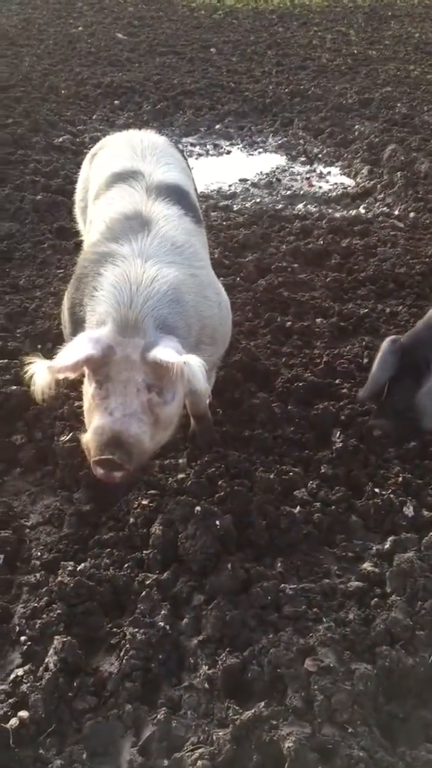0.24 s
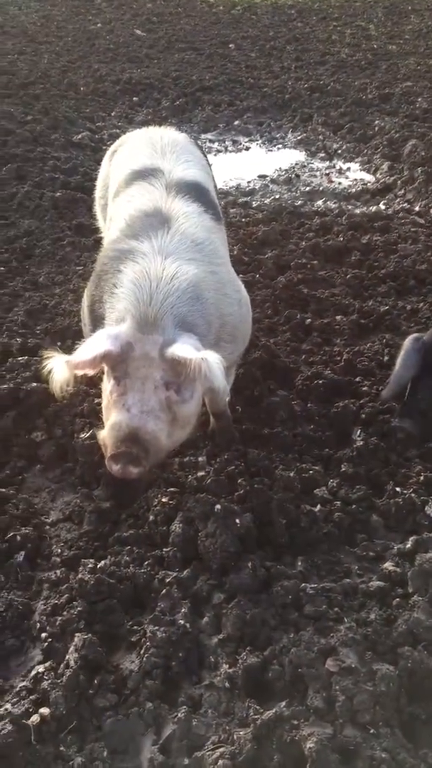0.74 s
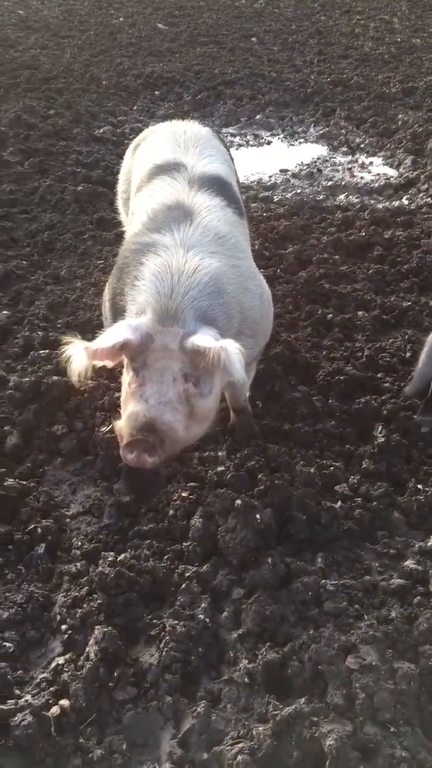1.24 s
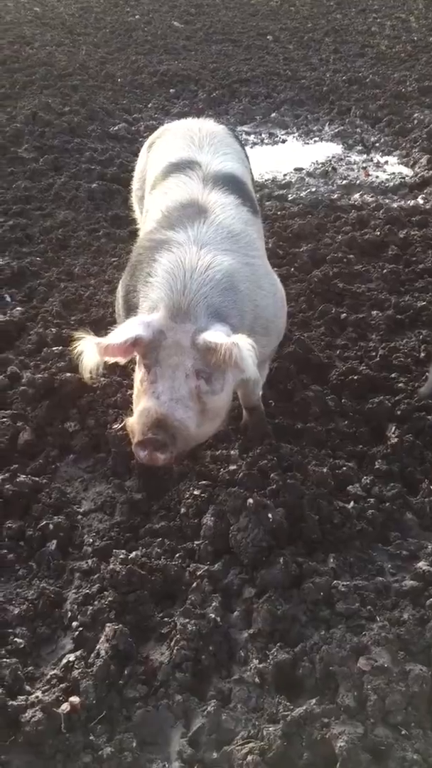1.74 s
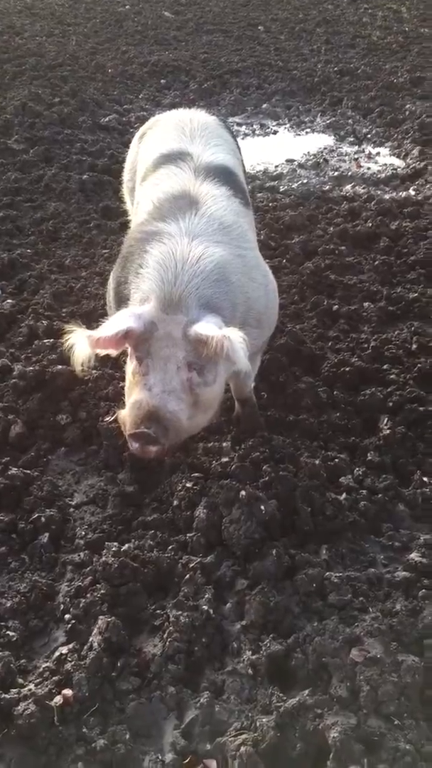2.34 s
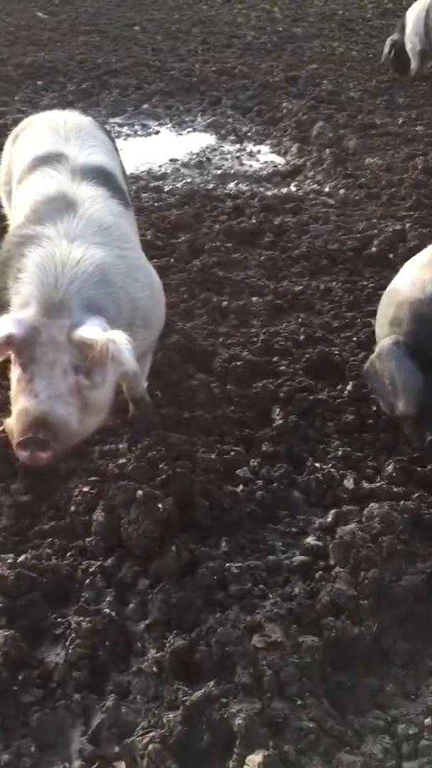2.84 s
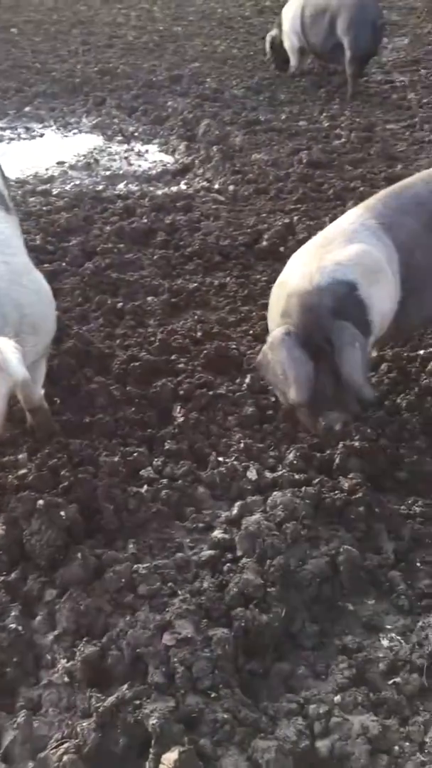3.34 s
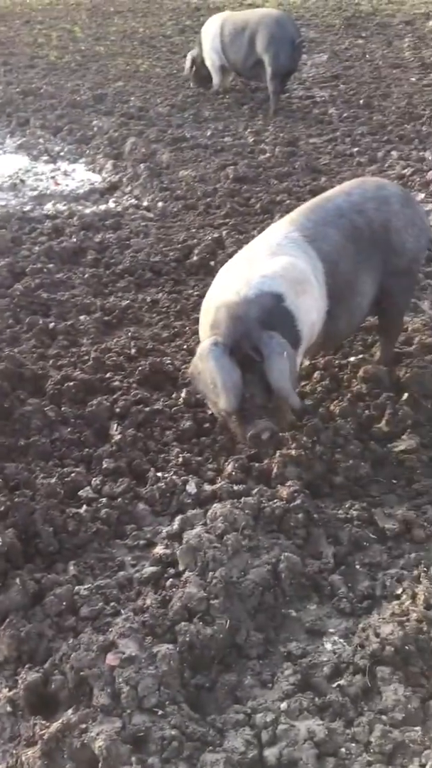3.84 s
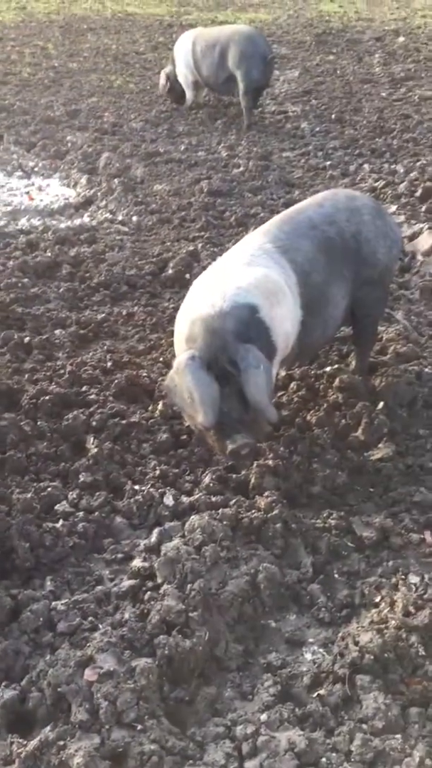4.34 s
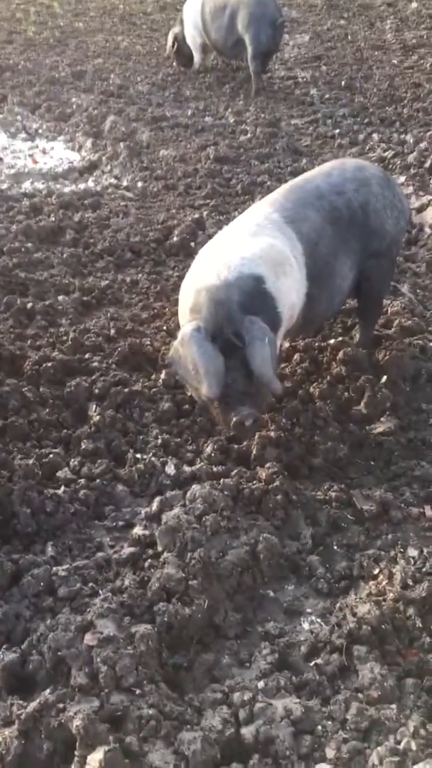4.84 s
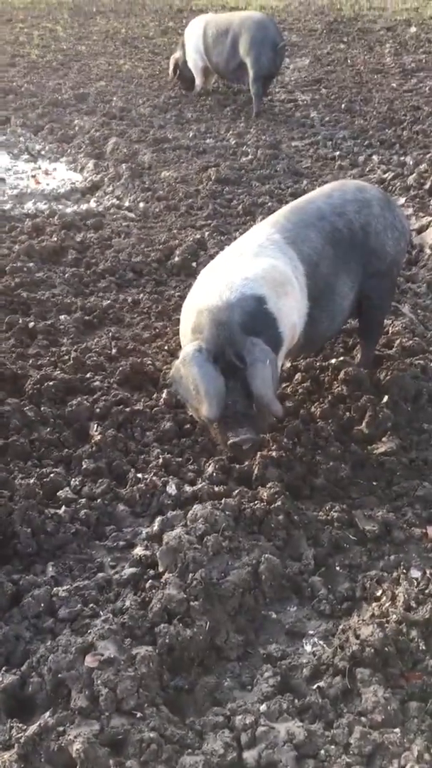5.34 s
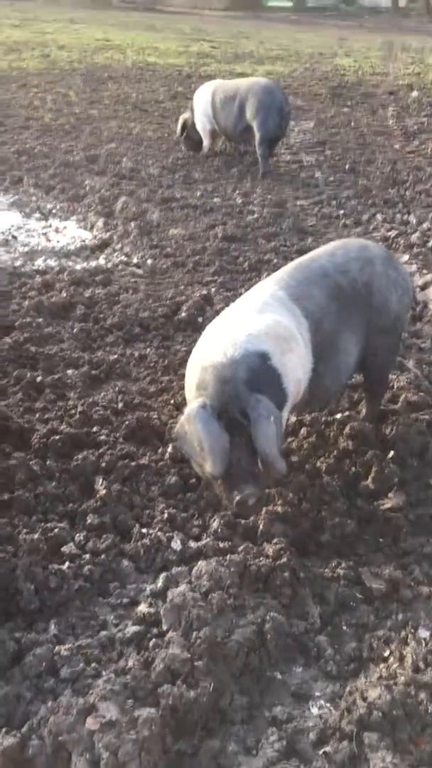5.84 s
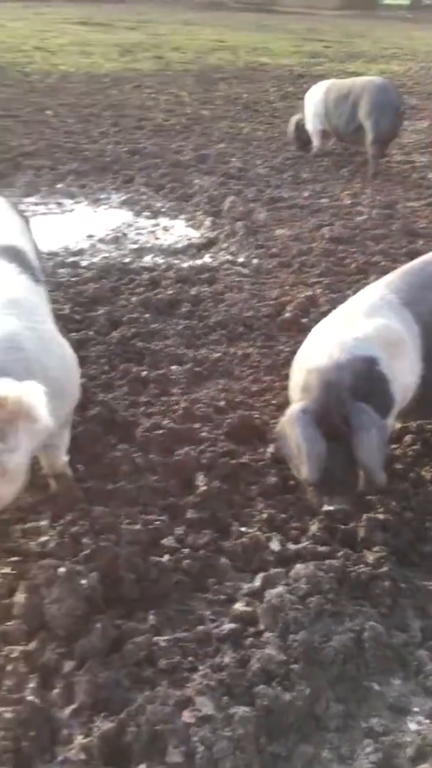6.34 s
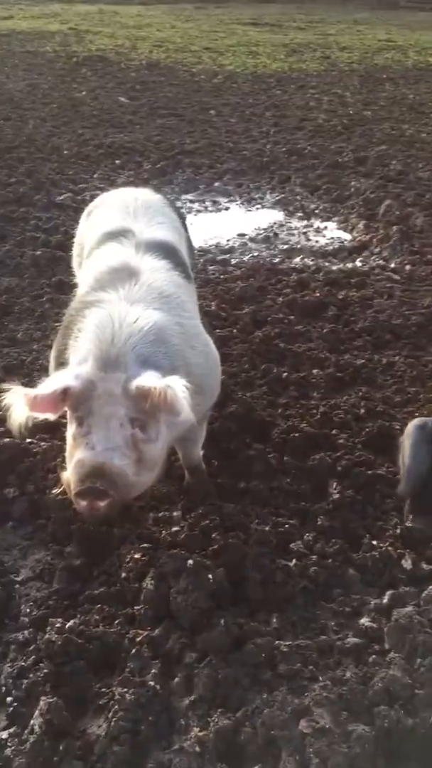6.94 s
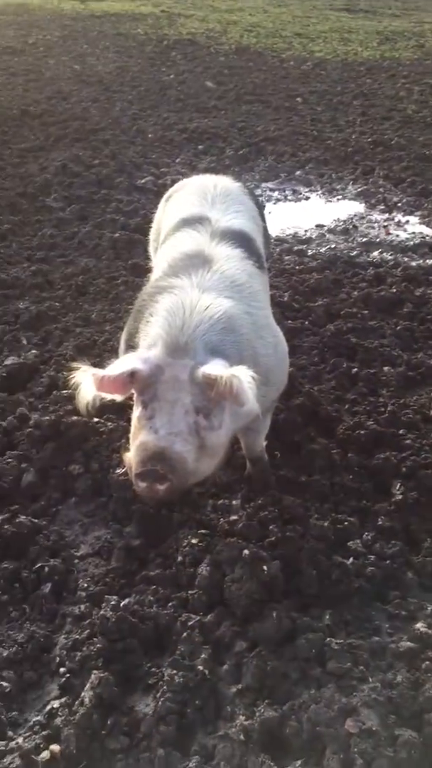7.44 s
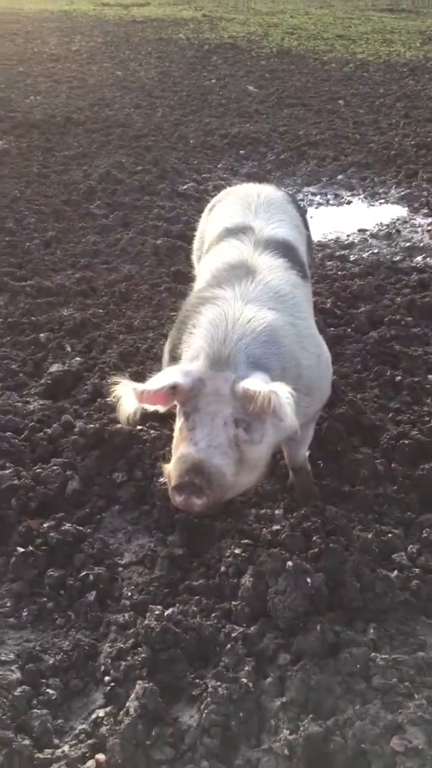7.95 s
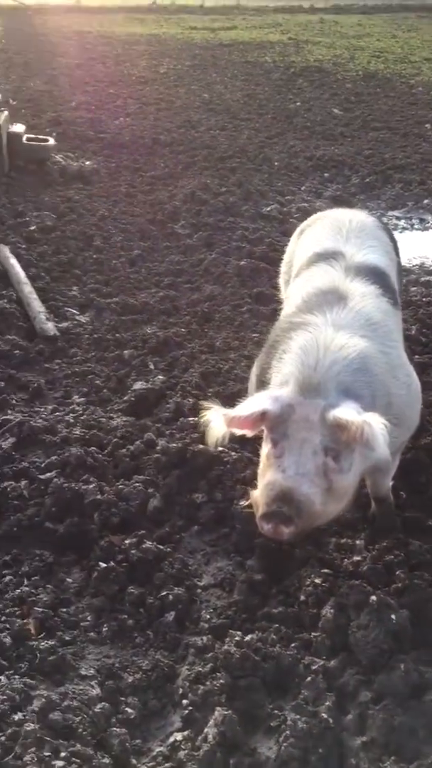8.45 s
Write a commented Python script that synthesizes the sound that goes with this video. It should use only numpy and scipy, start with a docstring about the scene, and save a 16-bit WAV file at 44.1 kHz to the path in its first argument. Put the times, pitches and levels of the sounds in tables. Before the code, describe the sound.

Outdoors in a muddy paddock, a distant road hums under faint gliding bird whistles. A hoarse bark runs straight into a long, throaty pig grunt close by. Small wet ticks and sniffs follow, then a weak far grunt and a short sharp one. A second long grunt trails into snuffling, then a knock with a thud and soft plops. Dry, close handheld microphone, no echo.

```python
"""Pigs in an open muddy paddock, with a far road humming throughout.
First come a soft sniff, a tick of wet mud and small birds, each a gliding whistle.
A hoarse bark at 1.9 s leads into a long grunt; ticks and sniffs follow, then a far grunt and a sharp one.
From 6.2 s a long grunt ends in sniffs; near 8 s come a last bird, a knock with a thud, plops and deep bass.
A grunt is a slow train of throat pulses, each ringing the throat and the chest and puffing out air."""
import sys
import numpy as np
from scipy import signal
from scipy.fft import rfft, irfft
from scipy.io import wavfile

SR = 44100
rng = np.random.default_rng(int(sys.argv[2]) if len(sys.argv) > 2 else 0)


def gain_from_db(level_db):
    """Convert decibel levels to linear amplitude factors (20 dB per decade)."""
    decades = np.asarray(level_db, float) / 20
    return 10 ** decades


def materialize(psi):
    """Save the field psi as 16-bit PCM at rate SR to the path in sys.argv[1].

    A 1-D psi becomes a single channel; in a 2-D psi each row is a channel.
    """
    bounded = np.clip(np.atleast_2d(psi).T, -1, 1)
    quanta = np.round(bounded * 32767).astype(np.int16)
    wavfile.write(sys.argv[1], SR, quanta)


N = 384066


def in_time(rows, s):
    """Each column of a curve table, read at times s."""
    at, *columns = np.transpose(rows)
    return [np.interp(s, at, c) for c in columns]


def span(rows):
    """Sample indices covered by a curve table."""
    return np.arange(round(rows[0][0] * SR), min(round(rows[-1][0] * SR), N))


def add(out, s, sound):
    """Mixes a short sound in at time s; a negative time counts back from the end."""
    i = round(s * SR)
    out[i:i + len(sound)] += sound[:N - i]


def drift(rate):
    """Random wander of about spread 1, with this many fresh values per second joined by lines."""
    knots = rng.standard_normal(int(N / SR * rate) + 2)
    return np.interp(np.arange(N) / SR * rate, np.arange(len(knots)), knots)


def coloured(spectrum, low_hz, high_hz):
    """Noise with the given spectrum, rms 1 between low_hz and high_hz."""
    hz = np.arange(N // 2 + 1) * SR / N + 1
    at, db = np.transpose(spectrum)
    gain = gain_from_db(np.interp(np.log(hz), np.log(at), db, left=-90, right=-90))
    bins = rfft(rng.standard_normal(N)) * gain
    inside = (hz > low_hz) & (hz < high_hz)
    return irfft(bins, N) * N / np.sqrt(2 * np.sum(abs(bins[inside]) ** 2))


def burst(length_s, decay_s):
    """Noise that starts at once and dies away."""
    t = np.arange(int(length_s * SR)) / SR
    return rng.standard_normal(len(t)) * np.exp(-t / decay_s)


def rings(hz, width_hz, db, length_s, spread_db=0., rise_s=0.00018):
    """One pulse sets damped resonances ringing, neighbours in opposite sign; peak 1."""
    hz, width_hz, db = (np.reshape(v, (-1, 1)) for v in (hz, width_hz, db))
    t = np.arange(int(length_s * SR)) / SR
    signs = (-1) ** np.arange(len(hz))[:, None]
    sizes = gain_from_db(db + spread_db * rng.standard_normal(db.shape)) * width_hz * signs
    modes = sizes * np.exp(-np.pi * width_hz * t) * np.sin(2 * np.pi * hz * t)
    wave = np.sum(modes, axis=0) * (1 - np.exp(-t / rise_s)) ** 2
    return wave / abs(wave).max()


def excite(wave, drive):
    """Drives a ringing body with a rough push; peak 1."""
    out = signal.fftconvolve(wave, drive)
    return out / abs(out).max()


def pulse_times(rows, per_s):
    """A pulse at the start and at every full cycle of the pulse rate; returns times and rates."""
    at = span(rows)
    rate = np.interp(at / SR, [row[0] for row in rows], per_s)
    cycles = np.cumsum(rate / SR)
    hits = np.searchsorted(cycles, np.arange(int(cycles[-1]) + 1))
    return zip(at[hits] / SR, rate[hits])


# tone colour of the far road: pitch_hz, level_db (per Hz, relative)
ROAD_COLOUR = [(30, -57), (79, 1.5), (114, -3.5), (174, -7.5), (230, -14), (400, -25), (600, -18.5),
               (800, -8.5), (1000, -6), (1300, -13), (1650, -24.5), (3300, -36.5), (9600, -44),
               (15800, -46.5)]
# traffic comes and goes: time_s, swell_db (added to the roar, a tenth of it to the rumble)
ROAD_SWELL = [(0, 3), (.4, 0), (1.7, 0.5), (3.2, -0.5), (5.3, 1), (6, 1), (7.3, 0.5), (7.8, 3), (8.2, 4.5),
              (8.71, -0.5)]
# the deep bass swells now and then: centre_s, half_width_s, level_db
DEEP_SWELLS = [(7.8, 0.67, -63), (8.75, 0.32, -48)]


def road():
    """Far traffic: tyre roar above 300 Hz, a wavering engine rumble below, a deep throb under it. Apart from
    the traffic, the deep bass swells now and then, most strongly near the end."""
    s = np.arange(N) / SR
    swell_db, = in_time(ROAD_SWELL, s)
    above = signal.butter(3, 300, "high", fs=SR, output="sos")
    below = signal.butter(3, 300, "low", fs=SR, output="sos")
    roar = signal.sosfilt(above, coloured(ROAD_COLOUR, 615, 1620))
    roar *= gain_from_db(-56 + swell_db + 1.9 * drift(12))
    rumble = signal.sosfilt(below, coloured(ROAD_COLOUR, 70, 140))
    rumble *= gain_from_db(-55 + 0.1 * swell_db + 2.86 * drift(12))
    deep_gain = gain_from_db(-63)
    for at, width_s, db in DEEP_SWELLS:
        deep_gain = deep_gain + gain_from_db(db) * np.exp(-((s - at) / width_s) ** 2)
    deep = coloured([(30, -23), (48, -8.5), (60, -18.0), (80, -3.5)], 30, 80)   # Hz, dB per Hz
    return roar + rumble + deep_gain * deep


# bird notes: start_s, length_s, from_hz, to_hz, level_db (before the flutter)
BIRD_NOTES = [(0.755, 0.077, 2930, 2370, -69.5), (1.028, 0.11, 4330, 8700, -76),
              (1.082, 0.06, 2700, 3600, -76), (1.36, .12, 7150, 6500, -81), (1.545, 0.079, 7000, 6050, -75),
              (1.687, 0.057, 6640, 5980, -78), (7.742, 0.43, 3670, 3030, -74.5)]


def birds():
    """Thin gliding whistles, rough when they sweep fast, blurred by the moving air between."""
    out = np.zeros(N)
    for s, length_s, from_hz, to_hz, db in BIRD_NOTES:
        size = int(length_s * SR)
        sweep_hz = to_hz - from_hz
        bend = 0.67 if sweep_hz > 0 else 0.73   # below 1: the pitch moves fastest at the start
        glide_hz = from_hz + sweep_hz * np.linspace(0, 1, size) ** bend
        glide_hz += 0.003 * sweep_hz / length_s * drift(150)[:size]
        whistle = np.sin(2 * np.pi * np.cumsum(glide_hz) / SR)
        add(out, s, gain_from_db(db) * np.sqrt(2 * np.hanning(size)) * whistle)
    return out * gain_from_db(4.5 * drift(120) - 1)


# ticks of wet mud: time_s, peak_db, centre_hz
TICKS = [(.738, -57, 7030), (1.589, -62, 8500), (3.424, -61, 12000), (3.52, -56.5, 3000),
         (3.636, -39, 2840), (3.637, -52, 10000), (3.643, -44.5, 3180), (3.853, -52.5, 9500),
         (3.861, -48, 12500), (4.272, -59, 8590), (8.008, -42.5, 2900), (8.237, -54, 3400)]
# soft low plops; the first is the thud of the knock: time_s, peak_db, pitch_hz, width_hz
PLOPS = [(7.978, -30.5, 242, 190), (8.266, -47, 417, 48), (8.316, -46.5, 343, 48), (8.338, -46, 370, 48),
         (8.343, -43, 196, 48)]


def ticks_and_plops():
    """Mud ticks crackle round their centre pitch; each plop, and the thud of the knock, is one damped ring."""
    out = np.zeros(N)
    for s, db, hz in TICKS:
        near_hz = hz * np.array([0.6, 1, 1.5])
        body = rings(near_hz, near_hz * 0.38, [-6, 0, -8], 0.01, rise_s=0.0001)
        add(out, s, gain_from_db(db) * excite(body, burst(0.023, 0.0036)))
    for s, db, hz, width_hz in PLOPS:
        add(out, s, gain_from_db(db) * rings(hz, width_hz, 0, 0.05, rise_s=0.003))
    return out


# the knock, a faint first strike and then the main hit: time_s, peak_db (of the ringing body)
KNOCK_PARTS = [(7.962, -34), (7.9707, -15)]
# resonances of the knocked body: pitch_hz, width_hz, level_db (relative)
KNOCK_MODES = [(229, 77, -2), (416, 180, -2), (635, 220, 6), (1170, 1050, -3), (2700, 450, -4.5),
               (4630, 1700, -15.5), (6350, 560, -15)]


def knock():
    """A faint first strike, then the main hit: each time a damped body rings under a faint burst of noise."""
    out = np.zeros(N)
    body = rings(*np.transpose(KNOCK_MODES), 0.06, rise_s=0.0001)
    for s, db in KNOCK_PARTS:
        push = gain_from_db(-24) * burst(0.016, 0.003)
        push[0] = 1
        add(out, s, -gain_from_db(db) * excite(body, push))
        add(out, s, gain_from_db(db - 37) * burst(0.02, 0.004))
    return out


# puffs of air through a snout: start_s, length_s, mouth_level_db, nostril_level_db (before the flutter)
SNIFFS = [(0, 0.72, -81, -91), (1.838, 0.14, -65, -82), (6.3, 0.29, -78, -71), (3.936, 0.29, -76, -76),
          (6.107, 0.19, -74, -73), (6.632, 0.1, -58, -103), (6.91, 0.08, -61.5, -102),
          (6.985, 0.15, -64, -87), (7.122, 0.11, -67, -71.5), (7.329, 0.15, -56, -68),
          (7.434, 0.081, -55, -65.5), (7.548, 0.13, -69, -66), (7.77, 0.056, -77, -68),
          (8.01, 0.66, -76, -97), (8.488, 0.09, -67, -76)]
# tone colour of air in the mouth: pitch_hz, level_db (per Hz, relative)
MOUTH_AIR = [(900, 10), (2000, 7.5), (3100, 3.5), (3700, -1), (4300, -8), (5100, -51), (5700, -6),
             (6300, -19)]
# tone colour of air in the nostrils: pitch_hz, level_db (per Hz, relative)
NOSTRIL_AIR = [(3500, 4.5), (5500, -0.5), (8500, 3.5), (12000, -1.5), (15500, -6)]


def sniffs():
    """Turbulent air in soft humps, slightly fluttering."""
    mouth, nostril = coloured(MOUTH_AIR, 1900, 4500), coloured(NOSTRIL_AIR, 5000, 15000)
    mouth_gain, nostril_gain = np.zeros((2, N))
    for s, length_s, mouth_db, nostril_db in SNIFFS:
        hump = np.sin(np.linspace(0, np.pi, int(length_s * SR))) ** 1.3
        add(mouth_gain, s, gain_from_db(mouth_db) * hump)
        add(nostril_gain, s, gain_from_db(nostril_db) * hump)
    return gain_from_db(1.5 * drift(30)) * (mouth_gain * mouth + nostril_gain * nostril)


# narrow bands of noise, mostly airy wheezes, one short pitched tick (8.228 s):
# start_s (negative counts from the end; past the end is silent), length_s, pitch_hz, width_hz, level_db (relative)
NARROW_NOISES = [(-0.5, 0.25, 4270, 560, -76), (0.355, 0.15, 4400, 400, -81), (0, 0.32, 350, 85, -67),
                 (7, 0.19, 9300, 1600, -72.5), (6.5, 0.18, 5600, 1000, -68), (2.5, .12, 6350, 200, -78),
                 (2.11, 0.14, 7300, 250, -81), (2, .25, 9400, 300, -81), (3, .15, 6000, 150, -78),
                 (6, 0.1, 9300, 200, -79), (6.72, 0.19, 7000, 150, -83), (7.015, 0.026, 2300, 200, -68),
                 (9, 0.037, 3170, 200, -71), (7.5, 0.57, 5660, 250, -85), (8.05, 0.54, 6200, 300, -92),
                 (8, 0.59, 4200, 350, -83.5), (8.228, 0.027, 2750, 120, -66)]


def narrow_noises():
    """Noise through one narrow resonance, swelling and fading: airy wheezes and one short pitched tick."""
    out = np.zeros(N)
    for s, length_s, hz, width_hz, db in NARROW_NOISES:
        resonance = signal.iirpeak(hz, hz / width_hz, fs=SR)
        settled = signal.lfilter(*resonance, rng.standard_normal(SR))
        noise = settled[-int(length_s * SR):]
        add(out, s, gain_from_db(db) * np.sqrt(np.hanning(len(noise)) * SR / width_hz) * noise)
    return out


# nostril whistle: time_s, pitch_hz, level_db (before a random wavering)
WHISTLE = [(6.29, 3480, -55), (6.32, 3530, -56), (6.38, 3380, -61.5), (6.43, 3400, -52)]


def nostril_whistle():
    """Air in a narrow nostril resonance: a gliding sine whose size wavers at random."""
    out = np.zeros(N)
    at = span(WHISTLE)
    hz, db = in_time(WHISTLE, at / SR)
    out[at] = gain_from_db(db) * drift(140)[at] * 2 * np.sin(2 * np.pi * np.cumsum(hz) / SR)
    return out


# a fast rasp in the nose on top of a grunt, one list a rasp: time_s, pulses_per_s, peak_db
RASPS = [
    [(2.44, 76, -40), (2.471, 98, -31), (2.5, 58, -29), (2.524, 46, -49)],
    [(6.918, 51, -54), (6.953, 79, -47), (6.985, 70, -56)],
]
# resonances of the rasping nose: pitch_hz, width_hz, level_db (relative)
RASP_MODES = [(2475, 280, -3), (2870, 57, -7.5), (3300, 220, -18), (4130, 310, -12), (5260, 310, -23),
              (8300, 1000, -29), (12600, 2300, -17)]


def nose_rasps():
    """A fast, uneven train of noisy pulses, each ringing the nose."""
    out = np.zeros(N)
    for rasp in RASPS:
        for s, _ in pulse_times(rasp, np.transpose(rasp)[1]):
            body = rings(*np.transpose(RASP_MODES), 0.02, spread_db=3.0)
            peak_db = in_time(rasp, s)[1]
            uneven_s = 0.00163 * rng.standard_normal()
            add(out, s + uneven_s, gain_from_db(peak_db) * excite(body, burst(0.026, 0.0036)))
    return out


# chest resonances of a grunt, a low boom and a buzz above it: pitch_hz, width_hz, level_db (relative)
BOOM = [(60.1, 17.4, 1.5), (80, 86, -4.5)]
BUZZ = [(202, 44, 9), (149, 45, 3), (121, 37, -3)]
# chest resonances of a short bark, a thump and a growl: pitch_hz, width_hz, level_db (relative)
THUMP = [(82, 58, 0)]
GROWL = [(306, 115, -24), (151, 86, -1)]


def chest_rings(barks):
    """Low and high chest ring, dulled above 290 Hz, each with its lead: the chest swells before the snap."""
    chests = ((THUMP, 0.0047), (GROWL, 0.0033)) if barks else ((BOOM, 0.0089), (BUZZ, 0.0044))   # lead, s
    dull = signal.butter(4, 290, fs=SR)
    return [(signal.lfilter(*dull, rings(*np.transpose(modes), 0.11, rise_s=0.0005)), lead_s)
            for modes, lead_s in chests]


# each pig's throat, one line a mouth shape from open to shut: eleven pitch_hz, then eleven level_db (relative)
THROATS = { "near": ([(562, 1320, 1026, 1760, 2120, 2394, 2900, 3360, 4030, 4450, 5400),
           (590, 1072, 866, 1550, 2180, 2550, 3330, 3680, 4180, 4560, 5780),
           (485, 800, 975, 1466, 1940, 2160, 3034, 3800, 4370, 4820, 5600),
           (515, 735, 890, 1374, 1686, 1630, 3120, 3660, 4140, 5050, 5650)],
           [(-2, -1.5, 1.5, -51, -10, -8, -17, -5.5, -18, -14, -24),
           (5.5, 5, -4.5, -6, -1, -15, -15, -24, -15, -22, -35),
           (-5.5, 4.5, -4, -6.5, -3.5, -8, -9.5, -18, -6, -19, -20.5),
           (-2, -0.5, -6.5, -4.5, 1, -8.5, -17.5, -24, -13.5, -27, -31)]),
           "hoarse": ([(655, 730, 950, 1200, 1900, 2000, 3500, 4100, 6200, 4300, 5670),
           (670, 700, 1050, 1280, 1630, 2620, 3060, 3800, 4500, 5190, 5670)],
           [(4.5, -28, -2, -6, 1, -7, -30, -49, -58, -61, -55),
           (4.5, 7.5, -18, -9.5, -10.5, -26, -15, -21, -48, -61, -55)]),
           "far": ([(376, 666, 910, 1244, 5100, 2500, 2500, 3400, 4200, 4520, 5430)],
           [(-6, -17.5, -6.5, -12.5, -47, -29.5, -43, -31.5, -60, -55, -56)]),
           "sharp": ([(555, 770, 1033, 1380, 1620, 2230, 2960, 3370, 4200, 3400, 5680),
           (557, 560, 1010, 1225, 2450, 2520, 3080, 4000, 4130, 5200, 5613)],
           [(2, -5, 0.5, 1.9, -3, -15, -12, -20, -35, -40, -44),
           (-9.5, -19, -5, 4, -37, -22, -12.5, -46, -58, -43, -68)]), }
# where those lines lie on the scale of mouth shapes: shape (0 open, 2 shut; no unit)
SHAPES_AT = (0, 1, 1.5, 2)
# how broad the eleven throat resonances are: width_hz
THROAT_WIDTH_HZ = [120, 90, 55, 95, 130, 130, 110, 160, 240, 130, 120]
# side chambers of the nose swallow these bands: pitch_hz, width_hz
NOSE_DIPS = [(2760, 370), (335, 86)]


def throat_ring(pig, mouth, snap_db, barks):
    """Ring of the throat for one pulse; the upper resonances change most from pulse to pulse."""
    hz, db = ([np.interp(mouth, SHAPES_AT[:len(c)], c) for c in np.transpose(shapes)]
              for shapes in THROATS[pig])
    height = np.log2(np.maximum(np.divide(hz, 1800), 1))   # octaves above 1800 Hz
    hz = hz * (1 + (0.007 + 0.012 * height) * rng.standard_normal(len(hz)))
    # weak pulses are duller: dB an octave above 1 kHz for each dB below full effort
    dull_db, full_effort_db = 0.36, -30
    db = db + dull_db * min(snap_db - full_effort_db, 0) * np.log2(np.maximum(hz / 1000, 1))
    spread_db = 1.3 + 1.5 * barks + 1.6 * height[:, None]
    throat = rings(hz, THROAT_WIDTH_HZ, db, 0.04, spread_db=spread_db, rise_s=0.0009)
    for dip_hz, width_hz in NOSE_DIPS:
        throat = signal.lfilter(*signal.iirnotch(dip_hz, dip_hz / width_hz, fs=SR), throat)
    return throat


def fold_snap(rate, barks):
    """The folds slap shut in two ragged steps; dull air leaks until the next pulse."""
    leak = burst(0.05, 0.012 if barks else 0.02)[:int(SR / rate)]
    drive = signal.lfilter([gain_from_db(-43 + 4 * barks)], [1, -0.7], leak)
    add(drive, 0, gain_from_db(-24) * burst(0.015, 0.004))   # ragged edges
    drive[0] = 1
    second_s = 0.0022 + 0.00008 * rng.standard_normal()
    drive[int(second_s * SR)] = rng.uniform(0.25, 0.55)
    return drive


def hiss_puff(rate, mouth):
    """Loudness shape of one puff; an open mouth hisses on between pulses."""
    t = np.arange(SR // 20) / SR
    lasting = 0.1 + 0.4 * max(1 - mouth / 1.6, 0)
    puff = (np.exp(-t / 0.005) + lasting) * (1 - np.exp(-t / 0.002))
    return puff[:int(SR / rate)]


# one list a grunt: time_s, snap_db (effort, relative), boom_db (chest, relative), mouth shape (0 open, 2 shut)
GRUNTS = [
    [(1.865, -24.5, -39.5, 0.2), (1.9, -23.5, -41, 0.88), (1.935, -30, -32, 0.83)],
    [(1.973, -39.5, -47, 0.0064), (2.025, -37, -42, 0.0038)],
    [(2.053, -29, -43, 0.031), (2.152, -33, -36, 0.56), (2.251, -29, -35.5, 1.31),
     (2.35, -30.5, -35.5, 1.52), (2.449, -25.5, -37, 1.78), (2.548, -23.5, -35.5, 2.01),
     (2.647, -24, -32.5, 1.93), (2.746, -26.5, -36, 2.34), (2.845, -37, -38.5, 1.66)],
    [(4.341, -40, -49, 0), (4.437, -32, -46, 0), (4.533, -34.5, -50, 0), (4.629, -47, -66, 0)],
    [(5.452, -41.5, -41, 0), (5.482, -27, -39, 0), (5.515, -25.5, -34.5, 0.43), (5.56, -19.5, -31.5, 0.74),
     (5.614, -33.5, -35.5, 0.25)],
    [(6.195, -34, -43.5, 0), (6.236, -26.5, -44, 0.048), (6.283, -32.5, -36, 0.38),
     (6.372, -25.5, -31.5, 1.17), (6.46, -24.5, -34.5, 1.35), (6.548, -27, -35.5, 1.37),
     (6.636, -29, -37, 1.61), (6.724, -29, -36.5, 1.72), (6.813, -27, -40, 1.71),
     (6.901, -31.5, -39.5, 1.83), (6.989, -38, -39, 1.8)],
    [(7.012, -43, -41, 2), (7.05, -36.5, -40, 1.2)],
    [(7.067, -37, -38, 3.1), (7.108, -28.5, -39, 1.35)],
]
# pulse rate at each row of those lists: pulses_per_s
PACE = [(36.32, 32.28, 30.23), (23.3, 23.3),
        (27.93, 30.69, 30.38, 29.71, 29.62, 29.74, 28.22, 30.08, 25.19), (30.32, 25.95, 23.74, 20.33),
        (36.71, 33.69, 31.55, 32.88, 31.27),
        (23.08, 26.1, 29.57, 26.16, 28.4, 27.49, 25.36, 25.56, 24.95, 29.45, 24.81), (36, 36),
        (32.18, 32.2)]
# who grunts each time: name of the pig (no unit)
CALLERS = ["hoarse", "near", "near", "far", "sharp", "near", "near", "near"]
# habits of each pig: buzz_db and air_db (both against the effort), barks (true or false)
HABITS = {"near": (-10.5, -32, False), "hoarse": (-8.5, -45, True), "far": (-13, -49, False),
          "sharp": (-8.5, -48, True)}
# stretches where alternate pulses go weak and strong: centre_s, half_width_s, swing_db (each way)
UNEVEN = [(2.28, .15, 4), (6.27, 0.051, 3)]
# tone colour of the hiss inside a grunt: pitch_hz, level_db (per Hz, relative)
GRUNT_AIR = [(4500, 4.5), (6200, 0.5), (7400, -3.5), (8300, -2), (9400, -1), (10600, -4), (13500, -5),
             (15600, -2)]


def grunts():
    """Each pulse: a double snap and leaking air through the throat, two chest rings, and a puff of hiss."""
    out, puffs = np.zeros(N), np.zeros(N)
    buzz_from_snap = 0.55   # share of the buzz level that follows the snap; the rest follows the boom
    for rows, per_s, pig in zip(GRUNTS, PACE, CALLERS):
        buzz_over_db, air_over_db, barks = HABITS[pig]
        chests = chest_rings(barks)
        for k, (s, rate) in enumerate(pulse_times(rows, per_s)):
            snap_db, boom_db, mouth = in_time(rows, s)
            buzz_db = buzz_over_db + buzz_from_snap * snap_db + (1 - buzz_from_snap) * boom_db
            air_db = snap_db + air_over_db
            swing_db = sum(db * max(1 - ((s - at) / half_s) ** 4, 0) for at, half_s, db in UNEVEN)
            snap_db -= (-1) ** k * swing_db
            throat = throat_ring(pig, mouth, snap_db, barks)
            voice = excite(throat, fold_snap(rate, barks))
            add(out, s, gain_from_db(snap_db + 1.5 + rng.standard_normal()) * voice)
            for (chest, lead_s), db in zip(chests, (boom_db, buzz_db)):
                rms = np.sqrt(np.sum(chest ** 2) * rate / SR)   # power = energy times rate
                add(out, s - lead_s, gain_from_db(db + 1.9 * rng.standard_normal()) * chest / rms)
            add(puffs, s, gain_from_db(air_db + 3.5 * rng.standard_normal()) * hiss_puff(rate, mouth))
    grain = gain_from_db(6 * drift(250) - 5)   # the hiss is grainy
    return out + puffs * grain * coloured(GRUNT_AIR, 5800, 12800)


def scene():
    """Pigs near, road and birds far; the open field gives nothing back."""
    background = road() + birds() + ticks_and_plops() + knock()
    pigs_and_air = sniffs() + narrow_noises() + nostril_whistle() + nose_rasps() + grunts()
    return (background + pigs_and_air)[None]


def low_pass(x):
    """Removes everything above the highest recorded frequency."""
    return signal.sosfilt(signal.butter(12, 16040, fs=SR, output="sos"), x)


def record(dry):
    """The microphone drops the deep bass and the extreme top, dips at its port, and rounds the peaks."""
    x = signal.sosfilt(signal.butter(6, 45, "high", fs=SR, output="sos"), dry)
    port = signal.lfilter(*signal.iirpeak(10400, 9, fs=SR), x)
    x = x - 0.28 * port
    rounded = 0.15 * np.tanh(x / 0.16)
    top_cut = signal.cheby2(12, 60, 16300, fs=SR, output="sos")   # 60 dB down from 16300 Hz up
    return low_pass(signal.sosfilt(top_cut, rounded))


dry = scene()
out = record(dry)
materialize(out)
```